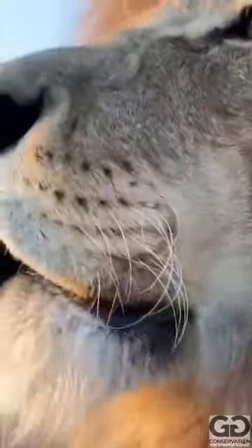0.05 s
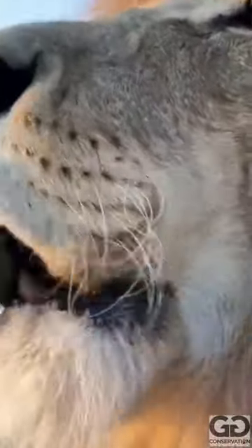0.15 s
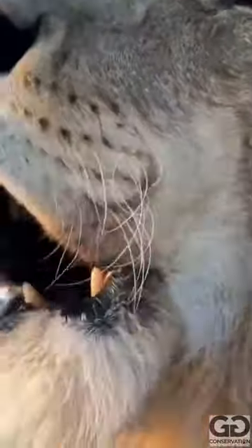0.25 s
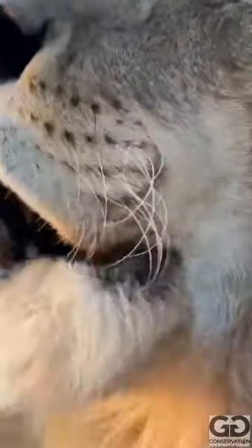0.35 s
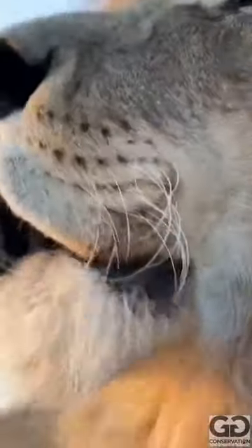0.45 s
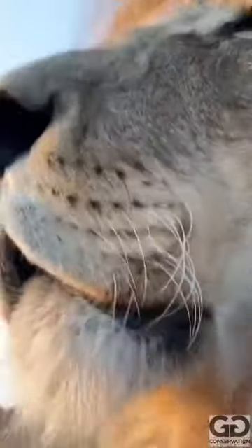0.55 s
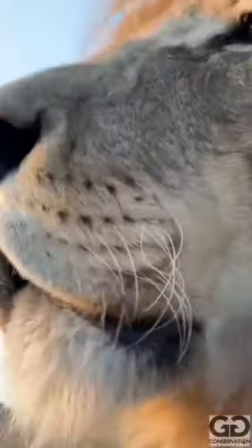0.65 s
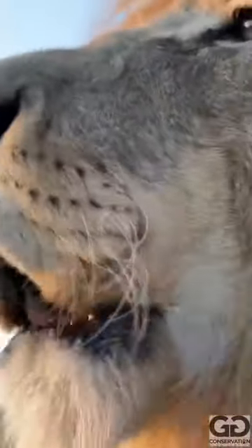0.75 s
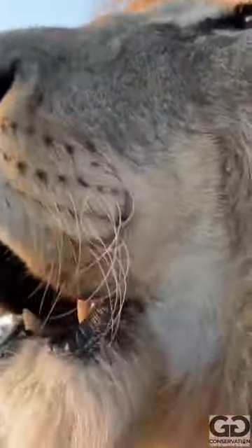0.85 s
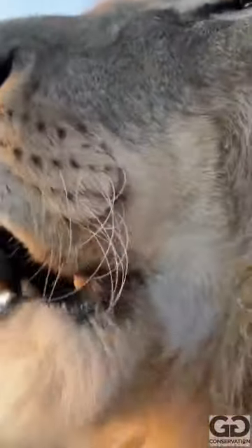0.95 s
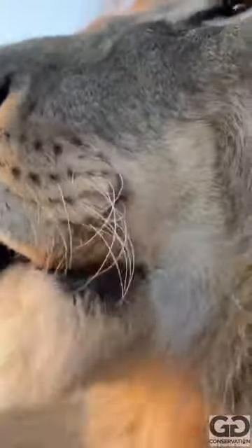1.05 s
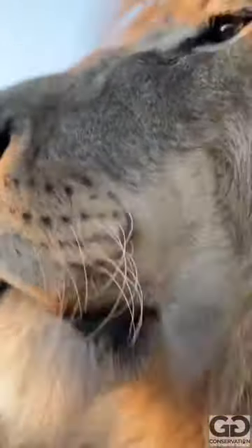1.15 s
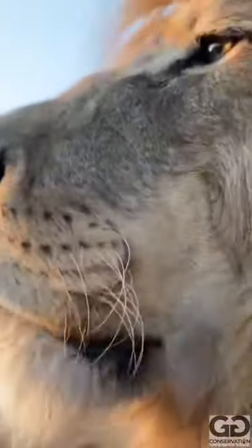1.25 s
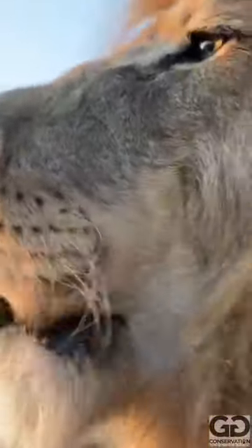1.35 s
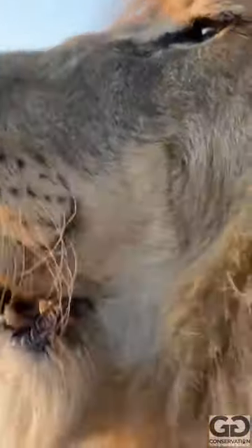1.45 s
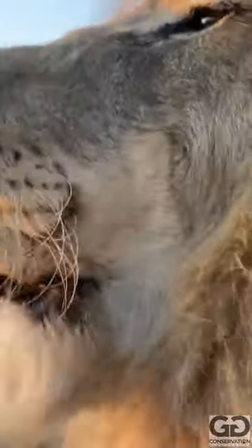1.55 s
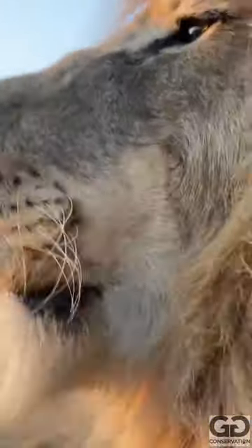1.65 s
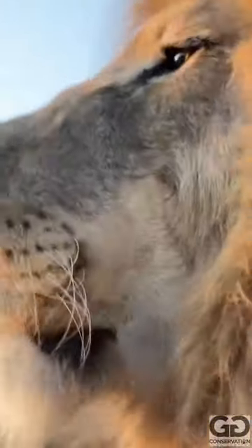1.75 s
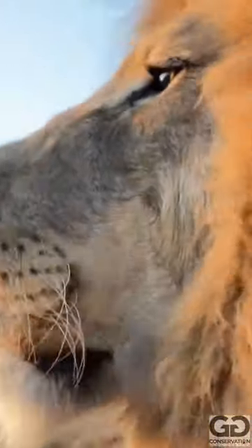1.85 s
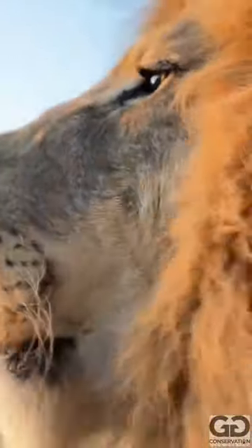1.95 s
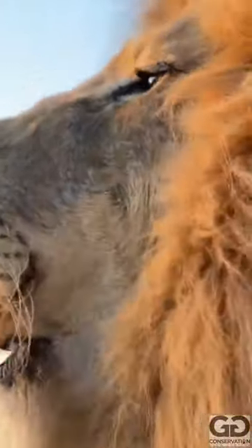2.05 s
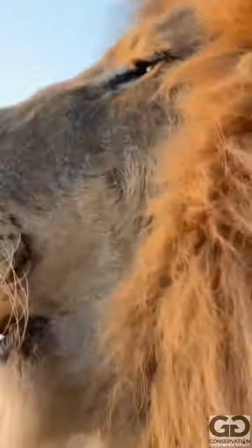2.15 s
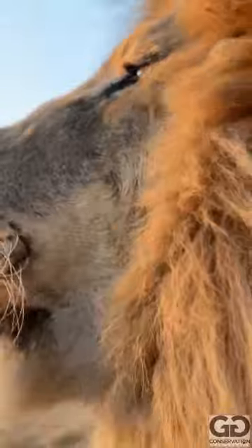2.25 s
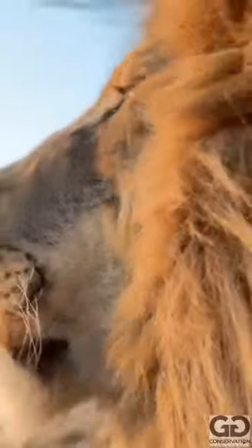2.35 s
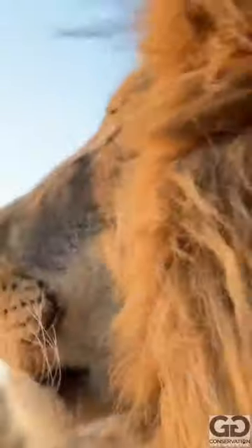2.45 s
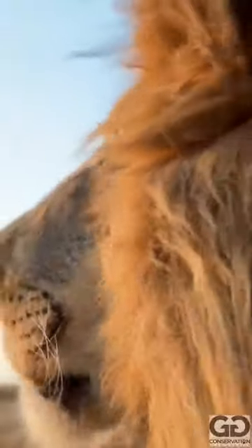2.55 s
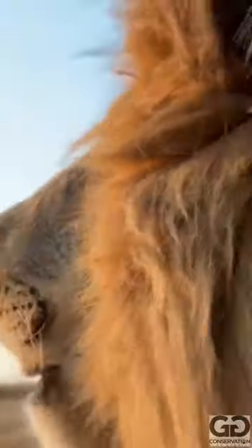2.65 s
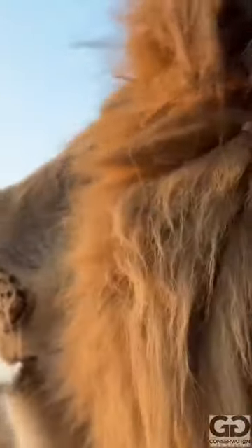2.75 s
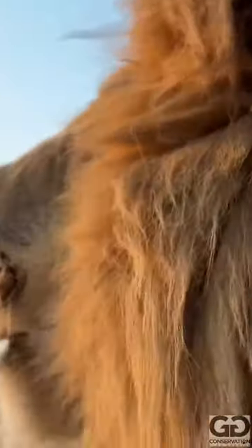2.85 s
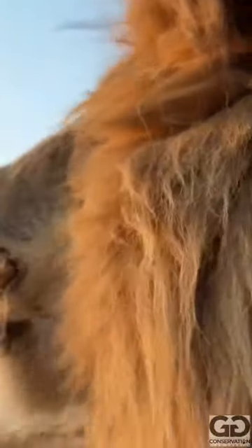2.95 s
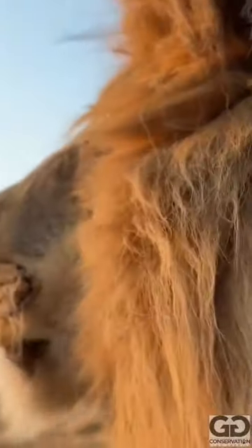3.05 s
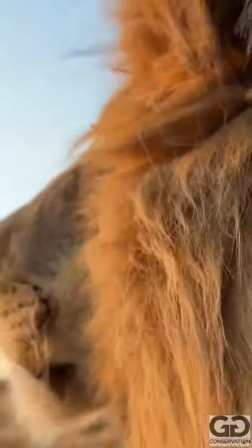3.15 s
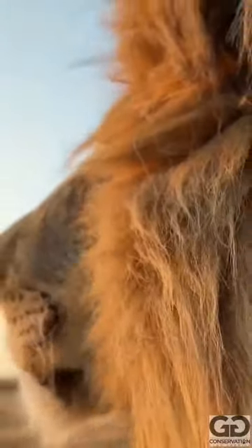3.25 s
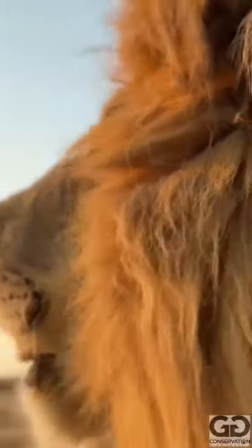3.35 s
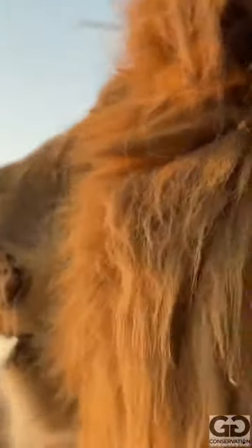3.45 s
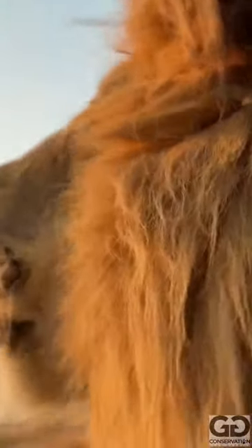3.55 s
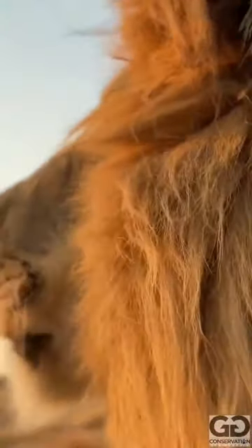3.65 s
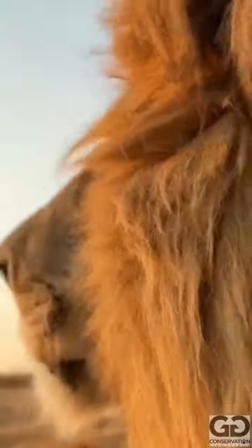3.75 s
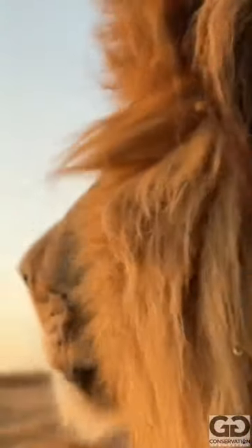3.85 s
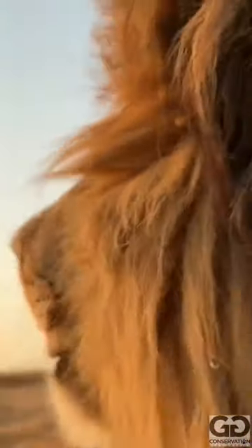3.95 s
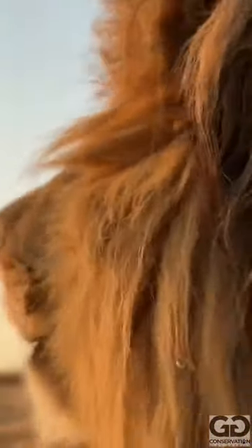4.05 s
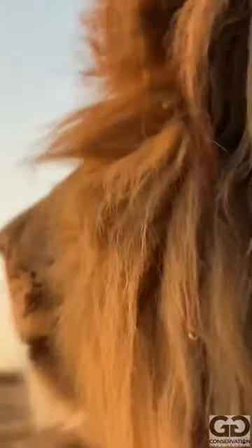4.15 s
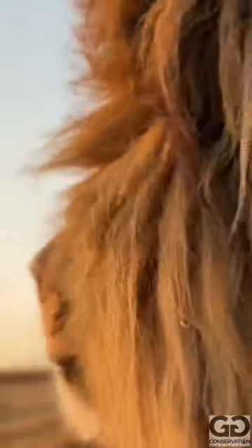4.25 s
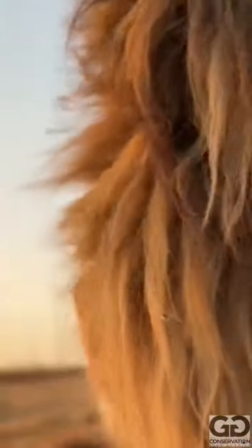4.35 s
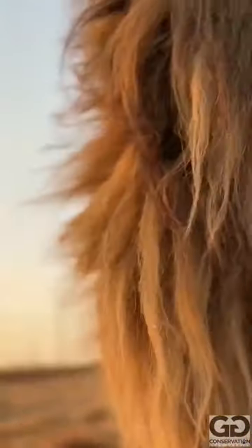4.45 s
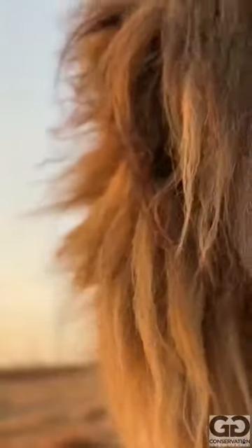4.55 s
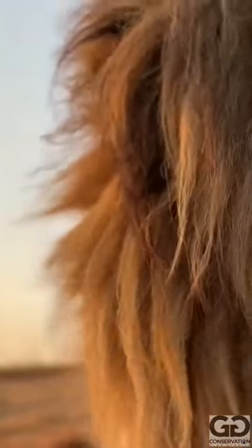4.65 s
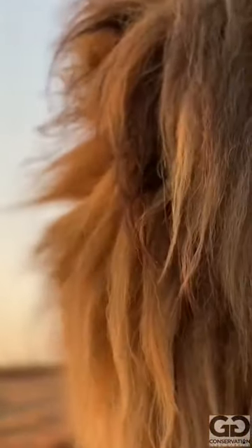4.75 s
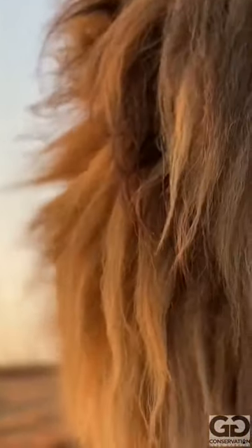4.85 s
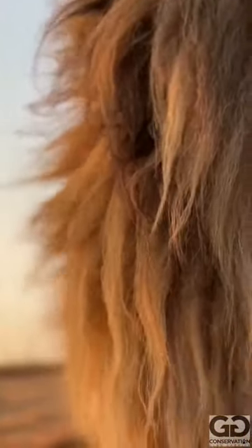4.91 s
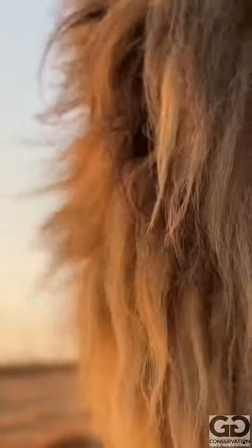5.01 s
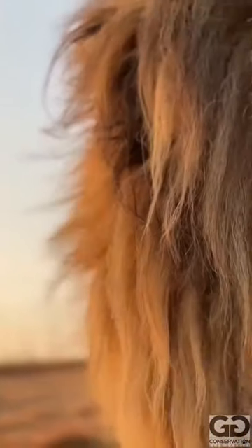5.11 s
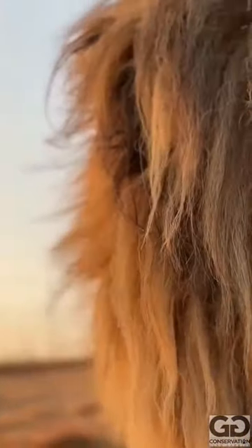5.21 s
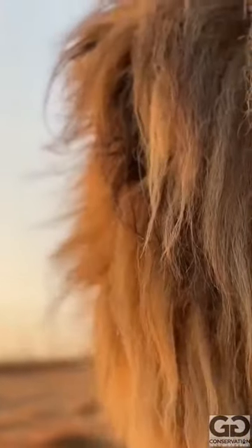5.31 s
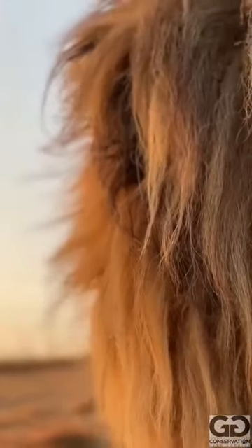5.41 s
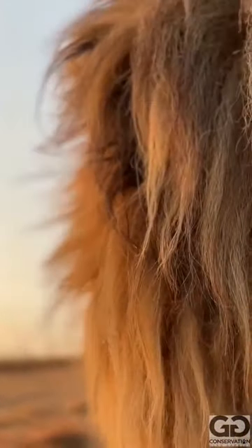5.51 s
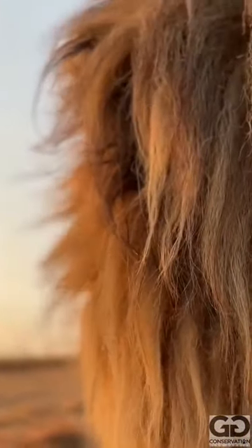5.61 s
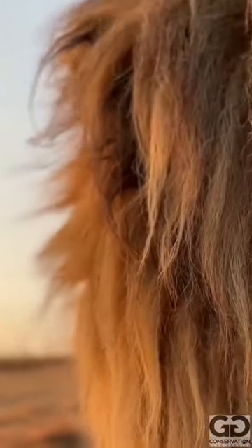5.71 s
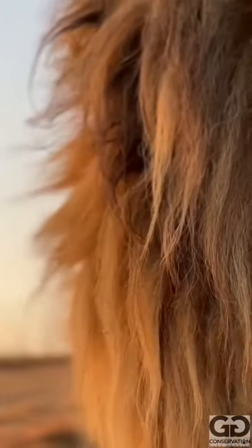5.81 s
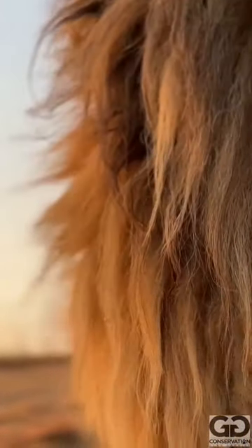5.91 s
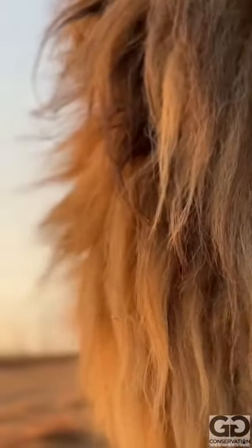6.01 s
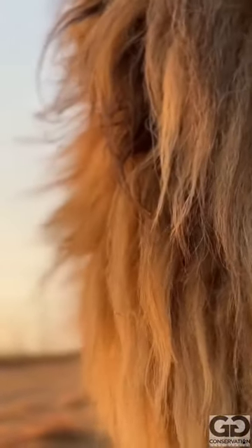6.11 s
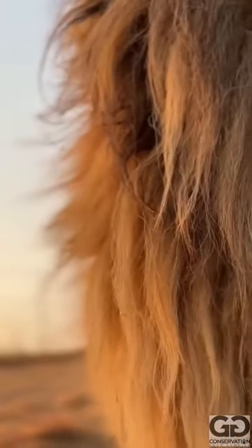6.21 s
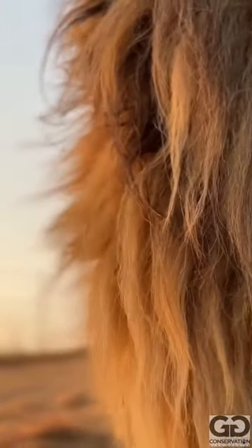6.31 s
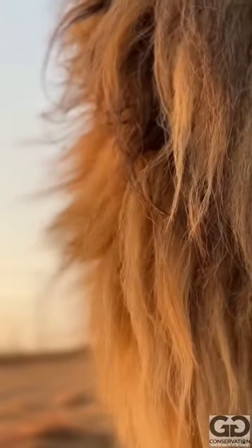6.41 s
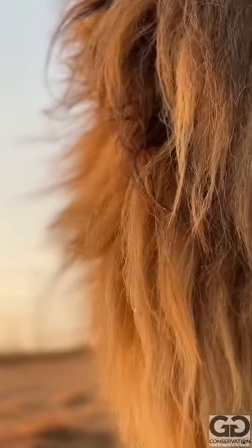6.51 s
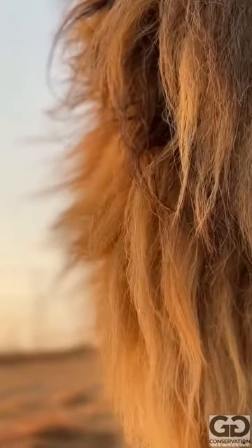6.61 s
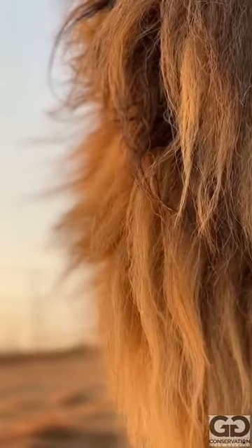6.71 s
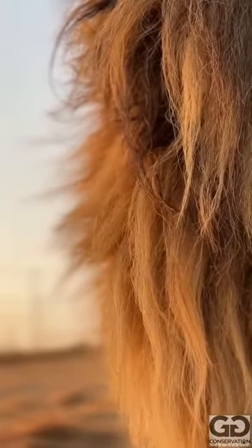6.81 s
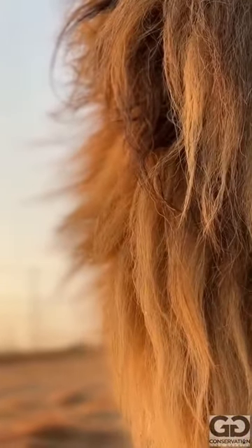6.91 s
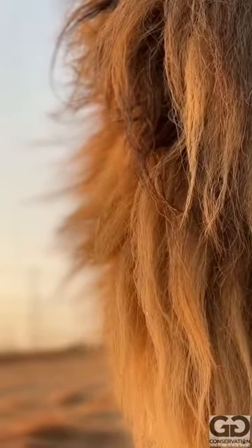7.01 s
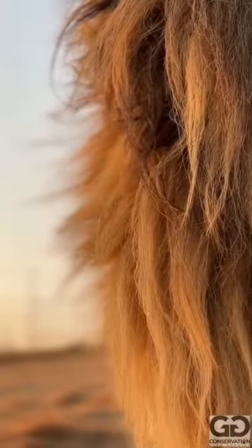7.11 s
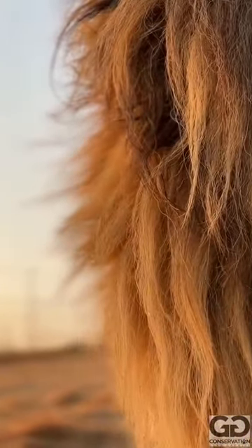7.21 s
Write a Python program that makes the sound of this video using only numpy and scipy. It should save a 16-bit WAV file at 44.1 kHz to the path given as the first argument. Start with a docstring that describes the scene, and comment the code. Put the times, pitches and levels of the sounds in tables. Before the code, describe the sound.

Close outdoors, a lion draws breath and grunts nine times in a slowing series, leaving a faint low hum.

```python
"""Over the murmur of an open plain, a gasp an arm's length from the microphone: a male lion is ending
a roaring bout with nine deep grunts, drawing air before each. His heavy vocal folds first buzz, then go
slack and flap in single beats while the jaw closes; chest, throat and mouth ring with them.
Afterwards two faint low hums remain, beating against each other like far engines."""
import sys
import numpy as np
from scipy import signal
from scipy.fft import rfft, irfft, next_fast_len
from scipy.io import wavfile
from scipy.ndimage import uniform_filter1d, map_coordinates

SR = 44100
rng = np.random.default_rng(int(sys.argv[2]) if len(sys.argv) > 2 else 0)


def transcribe(signal):
    """Save signal, clipped to [-1, 1], as a 16-bit WAV file at the path in sys.argv[1]."""
    frames = np.atleast_2d(signal).T
    limited = np.clip(frames, -1, 1)
    pcm = np.round(limited * 32767).astype(np.int16)
    wavfile.write(sys.argv[1], SR, pcm)


N = 320607
TIME = np.arange(N) / SR


def amp(db):
    """Decibels to gain."""
    return 10 ** (np.asarray(db) / 20)


def unit(x):
    """x at rms 1."""
    return x / np.sqrt(np.mean(x ** 2) + 1e-20)


def running_rms(x, size=1300):
    """The rms of x, smoothed twice over size samples."""
    power = uniform_filter1d(uniform_filter1d(x ** 2, size), size)
    return np.sqrt(np.abs(power) + 1e-12)


def along(points, hz):
    """Interpolate (Hz, value) points on a log frequency axis."""
    f, v = np.transpose(points)
    return np.interp(np.log(hz + 1), np.log(f + 1), v)


def curves(rows):
    """One value per sample for each column after the time."""
    times, *columns = np.transpose(rows)
    return [np.interp(TIME, times, column) for column in columns]


def noise():
    """White noise."""
    return rng.standard_normal(N)


def wobble(rate):
    """A smooth random curve, rate knots a second."""
    return map_coordinates(rng.standard_normal(int(N * rate / SR) + 4), [TIME * rate])


def coloured(x, spectrum):
    """x through a causal filter with the given (Hz, dB) spectrum."""
    size = 2 * next_fast_len(N // 2 + 8192)
    gain = amp(along(spectrum, np.fft.rfftfreq(size, 1 / SR)))
    cepstrum = irfft(np.log(gain))
    cepstrum[1:size // 2] *= 2  # folded for minimum phase
    cepstrum[size // 2 + 1:] = 0
    return irfft(rfft(x, size) * np.exp(rfft(cepstrum)))[:N]


def band(x, lo_hz, hi_hz, order):
    """x through a band-pass."""
    return signal.sosfilt(signal.butter(order, [lo_hz, hi_hz], "band", fs=SR, output="sos"), x)


def ring(x, hz, width_hz):
    """One resonance, whose centre may move; a unit blow rings at amplitude 1."""
    keep = np.exp(-np.pi * width_hz / SR)
    if np.ndim(hz) == 0:
        return signal.lfilter([1], [1, -keep * np.exp(2j * np.pi * hz / SR)], x).imag
    turn = np.exp(2j * np.pi * np.cumsum(hz) / SR)
    return (turn * signal.lfilter([1], [1, -keep], x * turn.conj())).imag


# The murmur of the plain at the microphone. Each row: time in seconds, level in dB.
MURMUR_LEVELS = [(0, -50.5), (.75, -61), (1.35, -67.5), (2.7, -65), (4.5, -68), (5.4, -62.5), (6.1, -46.5),
                 (6.5, -57.5), (7.27, -48.5)]
# Colours of the murmur and of the hiss under it. Each row: frequency in Hz, relative level in dB.
MURMUR_SPECTRUM = [(12, -78), (20, -45), (43, -24), (87, -20.5), (108, -6), (128, -11), (174, -24),
                   (205, -41), (328, -29.5), (387, -49), (774, -46.5), (1080, -70), (2040, -53),
                   (4950, -79.5), (15000, -82.5)]
HISS_SPECTRUM = [(30, 9), (300, 6), (1100, -0.5), (1700, -11.5), (4000, -21.5), (15000, -29)]


def plain():
    """Open ground all around: a dull, drifting murmur over a very faint even hiss."""
    level_db = curves(MURMUR_LEVELS)[0] + 1.4 * wobble(5.2)
    murmur = amp(level_db) * unit(coloured(noise(), MURMUR_SPECTRUM))
    return murmur + amp(-75) * unit(coloured(noise(), HISS_SPECTRUM))


# The breath before each grunt, close by. Each row: fullest moment in seconds, rise time in seconds,
# relative levels of throat and hiss in dB.
GASPS = [(0.267, 0.096, -43.5, -59), (.895, 0.11, -42.5, -61.5), (1.5, 0.097, -48, -64),
         (2.112, 0.11, -44.5, -62), (2.815, 0.12, -45.5, -65.5), (3.485, .125, -51, -69.5),
         (4.085, .09, -48, -68.5), (4.782, 0.14, -45.5, -66), (5.725, 0.22, -47, -68.5)]
# Colours of that breath, low and high. Each row: frequency in Hz, relative level in dB.
GASP_THROAT_SPECTRUM = [(88, -28.5), (150, 3.5), (205, -10.5), (301, -5), (399, 2.5), (481, -17), (574, -7),
                        (767, -25), (878, -9), (1010, -13.5), (1120, -15), (1300, -19), (1800, -30.5),
                        (2340, -52.5), (3960, -120)]
GASP_HISS_SPECTRUM = [(1000, -27), (1600, -2), (2200, 0.5), (3300, -6), (4200, -17.5), (6200, -18.5),
                      (9000, -30.5), (14000, -44)]


def gasps():
    """The lion draws air in: a soft swell through the resonances of his open throat."""
    fullest, rise, throat_db, hiss_db = np.transpose(GASPS)
    throat = gasp_swells(fullest, rise, throat_db, rise_db=28, fall_db_per_s=270.5)
    hiss = gasp_swells(fullest - .005, rise, hiss_db, rise_db=18, fall_db_per_s=380)  # peaks just ahead
    air = noise()
    vowel = ring(air, hz=395, width_hz=65) - amp(-6) * ring(air, hz=594, width_hz=52)
    vowel += amp(-.5) * ring(air, hz=919.7, width_hz=200) - amp(-4) * ring(air, hz=1160, width_hz=180)
    vowel = unit(band(vowel, lo_hz=250, hi_hz=1300, order=3))
    rush = throat * (amp(-3.5) * vowel + amp(-.5) * unit(coloured(noise(), GASP_THROAT_SPECTRUM)))
    rush += amp(1.5) * hiss * unit(coloured(noise(), GASP_HISS_SPECTRUM))
    flutter = amp(1.5 * wobble(40))
    chest = amp(1) * throat * unit(ring(noise(), hz=120, width_hz=15))
    return flutter * rush + chest


def gasp_swells(fullest, rise, levels_db, rise_db, fall_db_per_s):
    """Gain of one layer of the gasps: slow swells, each cut short by the coming grunt."""
    gain = np.zeros(N)
    for peak_s, rise_s, peak_db in zip(fullest, rise, levels_db):
        since = TIME - peak_s
        swell_db = rise_db * np.clip(-since / rise_s, 0, 2) ** 1.4
        gain += amp(peak_db - swell_db - fall_db_per_s * np.clip(since, 0, 1))
    return gain


# Nine grunts at arm's length. Each row: start, length and time the folds stay taut in seconds; pitch
# at first and on going slack in Hz; relative levels of chest, throat, mouth, rasp, upper throat
# resonances and top of the rasp in dB; base mouth resonance in Hz.
GRUNTS = [(0.343, 0.28, 0.075, 106.2, 116.1, -10.5, -11.5, -17, -32.5, 4, 1, 849),
          (0.956, 0.29, .1, 111, 117.9, -9.5, -12.5, -22, -34, 4, -2.5, 834),
          (1.560, .305, .085, 104, 120.9, -9.5, -11, -17.5, -35, 2.5, -0.5, 829),
          (2.176, 0.3, 0.098, 124, 122, -9.5, -13.5, -23, -38, -0.5, -2, 833),
          (2.878, .35, .115, 111.4, 109, -7, -16.5, -23, -41, 2, -1, 810),
          (3.542, 0.29, 0.082, 120, 110.4, -7, -12.5, -19, -41, -3, -7, 810.2),
          (4.139, .28, .075, 113, 106, -9, -17, -23, -42.5, -1, -8, 804),
          (4.841, .32, .1, 102.1, 106.9, -7, -13.5, -21.5, -41.5, 9, -8, 900),
          (5.813, 0.5, .09, 93, 97.8, -7.5, -14, -25, -45, 5, -8, 869.8)]
COLUMNS = "start length taut first_hz last_hz chest throat mouth rasp upper_throat rasp_top mouth_hz"
# Colour of the shuddering chest. Each row: frequency in Hz, relative level in dB.
CHEST_SPECTRUM = [(20, -24.5), (32, -19.5), (43, -1.5), (65, -5), (85, 3.5), (130, 6), (170, -4.5),
                  (215, -7), (260, -11), (400, -30.5), (900, -71)]


def grunts(jaw, slack):
    """Buzzing folds drive chest, throat and mouth; air rasps through them at every cycle."""
    chest, throat, mouth, rasp = effort()
    phase, blows = fold_buzz(slack)
    flow = airflow(slack)
    uneven = 1 + .091 * np.sin(phase / 2 + 1.2 * wobble(14))  # strong and weak cycles alternate
    tone = uneven * np.sin(phase) * amp(.5 - slack + (2.17 + 1.4 * slack) * wobble(60))
    rumble = coloured(noise(), CHEST_SPECTRUM)
    shudder_db = -8.5 + 2.5 * slack + .65 * raspiness_db()  # raspier grunts shake the chest more
    shudder = amp(shudder_db) * rumble / running_rms(rumble)
    drone = chest * amp(-8 * slack) * (tone + shudder)
    pulses = (blows + .5 * puffs(blows, life_s=.014)) * flow
    throat_gain = throat * amp(.5 - 4.5 * slack) * flow ** .6
    mouth_gain = mouth * amp(1 - 11 * slack) * flow ** 1.3
    body = driven(lambda x: throat_ring(x, jaw, spread=1.5 - slack), pulses, throat_gain)
    bark = driven(lambda x: mouth_ring(x, jaw), pulses, mouth_gain)
    grit = mouth_rasp(.5 * blows + puffs(blows, life_s=.009))
    air = rasp * grit / running_rms(grit) * amp(4 - 3.2 * slack) * flow ** .5
    return drone + body + bark + air


def which_grunt():
    """The number of the grunt that each sample belongs to."""
    return np.searchsorted([row[0] - .1 for row in GRUNTS[1:]], TIME)


def of_grunt(name):
    """One named column of the grunt table, sample by sample."""
    return np.transpose(GRUNTS)[COLUMNS.split().index(name)][which_grunt()]


def grunt_clock():
    """Per sample, in seconds: the grunt's age, its length, and how long its folds stay taut."""
    return TIME - of_grunt("start"), of_grunt("length"), of_grunt("taut")


def raspiness_db():
    """How much more each grunt rasps than the average one, sample by sample."""
    return of_grunt("rasp") - np.transpose(GRUNTS)[COLUMNS.split().index("rasp")].mean()


def slackness(delay_s=.02, slacken_s=.035):
    """0 while the folds are taut, 1 while they hang loose."""
    age, _, taut = grunt_clock()
    resting = np.clip(-age / .02 - 1, 0, 1)
    return np.maximum(resting, np.clip((age - taut - delay_s) / slacken_s + .5, 0, 1))


# How each part of the voice swells and fades. Each holds: starting level against its peak in dB,
# attack in seconds, change by the end in dB, exponent that bends the fall.
CHEST_ENVELOPE = (-16.5, 0.1046, -30.5, 2.04)
THROAT_ENVELOPE = (-14.5, 0.28, -48.5, 1.78)
MOUTH_ENVELOPE = (-11.5, 0.28, -45, 1.55)
RASP_ENVELOPE = (-21, 0.1131, -39, 1.82)


def effort(onset_db_per_s=1399.5, stop_db_per_s=519):
    """Gains of chest, throat, mouth and rasp: a quick swell, then a fall once the folds go slack."""
    age, length, taut = grunt_clock()
    spent = np.clip((age - taut) / (length - taut), 0, 1)
    edges_db = onset_db_per_s * np.minimum(age, 0) - stop_db_per_s * np.maximum(age - length, 0)
    parts = dict(chest=CHEST_ENVELOPE, throat=THROAT_ENVELOPE, mouth=MOUTH_ENVELOPE, rasp=RASP_ENVELOPE)
    gains = []
    for part, (start_db, attack_s, fall_db, bend) in parts.items():
        swell_db = start_db * (1 - np.clip(age / attack_s, 0, 1)) ** 3.2
        gains.append(amp(of_grunt(part) + edges_db + swell_db + fall_db * spent ** bend))
    return gains


def fold_buzz(slack, sag_hz_per_s=25, jitter=.03, slack_jitter=.1, scatter_db=3):
    """Phase of the folds and a blow per closure; taut folds glide, slack ones sag and stumble."""
    age, length, taut = grunt_clock()
    first_hz, last_hz = of_grunt("first_hz"), of_grunt("last_hz")
    hz = first_hz + (last_hz - first_hz) * np.clip(age / taut, 0, 1)
    hz -= sag_hz_per_s * np.clip(age - taut, 0, length)
    hz *= 1 + (jitter + slack_jitter * slack) * wobble(110)
    cycles = np.cumsum(hz) / SR
    closes = np.diff(np.floor(cycles), prepend=0) > 0
    return 2 * np.pi * cycles, closes * amp(scatter_db * noise())


def airflow(slack, leak=.58):
    """Less air passes while the folds stick together ahead of each slap; slack folds stick longer."""
    flow = np.ones(N)
    for at_s, _, _ in slaps():
        stuck_s = .01 + .013 * slack[round(at_s * SR)]
        flow[max(0, round((at_s - stuck_s) * SR)):round((at_s + .002) * SR)] = leak
    return uniform_filter1d(flow, size=130)


def puffs(blows, life_s):
    """Every blow releases a dying burst of turbulent air of the same energy."""
    keep = np.exp(-2 / (life_s * SR))
    return noise() * np.sqrt(signal.lfilter([1 - keep], [1, -keep], blows ** 2))


def driven(resonator, pulses, gain):
    """The resonator, driven so that its rms follows gain; it rings on when the pulses stop."""
    return resonator(pulses * gain / running_rms(resonator(pulses), size=1100))


# The jaw's path in the first seven grunts. Each row: share of the grunt's length, throat resonance
# in Hz, ratio to the base mouth resonance, lip resonance in Hz.
JAW_PATH = [(-.3, 325, 1.12, 1180), (0, 376, 1.05, 1080), (0.221, 410, 0.95, 1137), (.4, 415.6, 1.04, 1125),
            (.6, 364, .96, 1093), (.8, 324, 1.1, 1082), (1, 305, 1.14, 1210)]
# The last two, drawn-out grunts bend their vowel, one list each.
# Each row: time in seconds, then throat, mouth and lip resonances in Hz.
GROAN_VOWELS = [
    [(4.83, 380, 793, 1130), (4.885, 428, 850, 1118), (4.93, 395, 899.8, 1170), (4.965, 366, 772, 1083),
     (5.0, 349, 849, 1210), (5.025, 355.5, 934, 1226), (5.06, 346, 796, 1235), (5.115, 309, 960, 1268),
     (5.17, 290.1, 900, 1223)],
    [(5.805, 363, 780.3, 1013), (5.875, 357, 948.4, 1080), (5.912, 401.4, 747, 1118),
     (5.96, 350.7, 780, 949), (6.002, 417, 700, 1130), (6.035, 388, 834, 1240), (6.07, 356, 928, 1372),
     (6.11, 341, 864, 1250), (6.29, 302, 900, 1112)],
]


def jaw_resonances():
    """Throat, mouth and lip resonances in Hz: as the jaw shuts the first sinks, the other two rise."""
    age, length, _ = grunt_clock()
    share, *columns = np.transpose(JAW_PATH)
    throat_hz, mouth_ratio, lips_hz = [np.interp(age / length, share, column) for column in columns]
    jaw = np.array([throat_hz, of_grunt("mouth_hz") * mouth_ratio, lips_hz])
    for number, rows in enumerate(GROAN_VOWELS, len(GRUNTS) - len(GROAN_VOWELS)):
        jaw = np.where(which_grunt() == number, curves(rows), jaw)
    return jaw


def throat_ring(x, jaw, spread):
    """The sharp main resonance of the long throat; two broader ones grow as the jaw opens."""
    hz = jaw[0]
    main = amp(1) * ring(x, hz, width_hz=23.4)
    opening = np.clip((hz - 315) / 60, .1, 1) * amp(of_grunt("upper_throat"))
    upper = amp(-7.5) * ring(x, hz=464, width_hz=81) + amp(-14.5) * ring(x, hz=551.4, width_hz=42)
    return band(main + spread * opening * upper, lo_hz=251, hi_hz=680, order=3)


def mouth_ring(x, jaw):
    """Mouth and lip resonances, each with an upper neighbour; an unmoving one lies below them."""
    _, mouth_hz, lips_hz = jaw
    mouth = ring(x, mouth_hz, width_hz=25) - amp(.5) * ring(x, mouth_hz * 1.17, width_hz=49)
    lips = amp(1.5) * ring(x, lips_hz, width_hz=45) - amp(-.5) * ring(x, lips_hz * 1.085, width_hz=61)
    low = amp(-3.5) * ring(x, hz=681.3, width_hz=32)
    return band(mouth + lips - low, lo_hz=575, hi_hz=1279, order=4)


# Colour of the rasp, close to the mouth. Each row: frequency in Hz, relative level in dB.
RASP_SPECTRUM = [(900, -48), (1350, 6), (1600, -5), (1900, 1), (2600, -2.5), (3300, -5.5), (4100, -13.5),
                 (4700, -14), (5030, -17.5), (5400, -12.5), (8000, -21), (12800, -27.5), (13400, -41.5),
                 (15500, -45)]


def mouth_rasp(x, life_s=.0044, direct=.58):
    """The dense high resonances of the mouth lie differently in every grunt; late grunts are duller."""
    t = np.arange(SR // 40) / SR
    owner = which_grunt()
    rung = np.zeros(N + len(t))
    for number in range(len(GRUNTS)):
        cavity = rng.standard_normal(len(t)) * np.exp(-t / life_s)
        cavity = cavity / np.linalg.norm(cavity) + direct * (t == 0)
        part = signal.fftconvolve(x[owner == number], cavity / np.linalg.norm(cavity))
        start = np.argmax(owner == number)
        rung[start:start + len(part)] += part
    rasp = coloured(rung[:N], RASP_SPECTRUM)
    low = signal.sosfiltfilt(signal.butter(2, 5500, fs=SR, output="sos"), rasp)
    return low + amp(of_grunt("rasp_top")) * (rasp - low)


# Single slaps of the folds. Each row: time in seconds, strength in dB, brightness in dB.
FOLD_SLAPS = [(0.0, -30, 3), (0.368, -7, 1.5), (0.436, -14, 0.5), (0.464, -1.5, -0.5), (0.491, -10.5, -0.5),
              (0.558, -26.5, -6.5), (0.986, -8, 3.5), (1.057, -16, 8.5), (1.083, -3.5, 4),
              (1.138, -19, 3.5), (1.172, -19, -3), (1.585, -7.5, 2.5), (1.668, -4.5, 1), (1.692, -10.5, 4),
              (1.751, -21, -6), (2.239, -4.5, 3.5), (2.283, -1.5, 2), (2.304, -8.5, 2.5), (2.405, -31, -2),
              (2.927, -7, 0), (2.988, -8, -3), (3.033, -7, 4.5), (3.079, -16, -2), (3.127, -21, -3),
              (3.561, -7, 0.5), (3.652, -4.5, 4), (3.679, -19, 0.5), (3.751, -23, -6), (4.163, -8.5, 4),
              (4.194, -5.5, 2), (4.233, -2, 0.5), (4.261, -9, 1.5), (4.33, -21.5, -3), (4.886, -8.5, -2),
              (4.923, -10, -1), (4.996, -5.5, -8.5), (5.02, -4, -2.5), (5.052, -16, 1.5),
              (5.134, -35.5, -4), (5.84, -8, -11), (5.868, -2, 0), (5.88, -4, -0.5), (5.905, -4, -2),
              (5.952, 0, -5), (5.973, -0.5, 1.5), (5.995, 0.5, 1), (6.041, -12.5, -10), (6.072, -7.5, 1.5),
              (6.107, -18, 0.5), (6.177, -25.5, -2)]


def slaps(after_s=.043, after_loss_db=17.5, pause_s=.15):
    """Every slap: a soft one opening each grunt, the listed ones, a weaker beat before each pause."""
    opening = [(row[0], -22, -2) for row in GRUNTS]
    gaps = np.diff([row[0] for row in FOLD_SLAPS], append=np.inf)
    after = [(at_s + after_s, db - after_loss_db, bright_db)
             for (at_s, db, bright_db), gap in zip(FOLD_SLAPS, gaps) if gap > pause_s]
    return opening + list(FOLD_SLAPS) + after


def slap_blows(feeble_db=-28):
    """Blows on throat, chest, mouth and rasp; weak slaps are mostly thump, feeble ones lose that too."""
    at_s, db, bright_db = np.transpose(slaps())
    at = np.round(at_s * SR).astype(int)
    harsh_db = raspiness_db()[at]  # a slap is as harsh as its grunt
    chest_db = -10 + .17 * db + .6 * np.minimum(db - feeble_db, 0)
    mouth_db = -16.5 + .78 * db + bright_db + .5 * harsh_db
    rasp_db = -29 + .66 * db + bright_db + .7 * harsh_db
    blows = np.zeros((4, N))
    blows[:, at] = amp([db, chest_db, mouth_db, rasp_db])
    return blows


def flaps(jaw, slack):
    """Each lone slap of the folds thumps the chest, rings the tract and spits a puff of air."""
    throat, chest, mouth, rasp = slap_blows()
    chest = chest * amp(-15 * (1 - slack))  # only slack folds let a whole gulp of air through
    thump = amp(1.5) * ring(chest, hz=109, width_hz=18) - amp(-6) * ring(chest, hz=58, width_hz=26)
    body = amp(-3.5) * throat_ring(throat, jaw, spread=1.2 - .86 * slack)
    bark = amp(-6.5) * mouth_ring(mouth + .92 * puffs(mouth, life_s=.0082), jaw)
    crack = .45 * rasp + puffs(rasp, life_s=.0033) + .7 * puffs(rasp, life_s=.018)
    spit = amp(30.5) * mouth_rasp(crack)
    return band(thump, lo_hz=21.7, hi_hz=230, order=2) + body + bark + spit


# The ground around the lion. Each row: frequency in Hz, time to die away by 60 dB in seconds.
GROUND_DECAY = [(60, 0.85), (120, 0.19), (350, 0.22), (1000, 0.23), (4000, 0.1), (12000, 0.17)]


def ground(x):
    """Scatter from the sand and scrub around the microphone, longest in the bass."""
    hz, t, spectra = signal.stft(rng.standard_normal(SR // 2), SR, nperseg=512)
    decay = amp(-60 * t / along(GROUND_DECAY, hz)[:, None])
    tail = signal.istft(spectra * decay, SR, nperseg=512)[1]
    return signal.fftconvolve(x, tail / np.linalg.norm(tail))[:N]


# Two hums far across the plain. Each row: time in seconds, pitch in Hz, relative level in dB.
LOW_HUM = [(6.3, 112.4, -40.5), (6.466, 119.9, -43), (6.762, 130, -39), (7.03, 128.9, -43),
           (7.1, 131.1, -45.5), (7.24, 134, -46.5)]
HIGH_HUM = [(6.33, 149.4, -55.5), (6.546, 167.3, -61.5), (6.838, 170, -56.5), (6.89, 162.2, -54),
            (7.138, 155.8, -41), (7.24, 151, -40)]


def hums(fade_in_s=.0585):
    """Two far hums come in; toward the end their pitches draw closer and their beat slows."""
    both = np.zeros(N)
    for rows in (LOW_HUM, HIGH_HUM):
        hz, db = curves(rows)
        swell = np.clip((TIME - rows[0][0]) / fade_in_s + 1, 0, 1)
        both += swell * amp(db) * np.sqrt(2) * np.sin(2 * np.pi * np.cumsum(hz) / SR)
    return amp(-2.5) * both


def scene():
    """One microphone on open ground: the lion at arm's length, the quiet plain behind him."""
    jaw, slack = jaw_resonances(), slackness()
    lion = grunts(jaw, slack) + flaps(jaw, slack) + gasps()
    return (lion + amp(-25) * ground(lion) + hums() + plain())[None]


def record(dry, low_cut_hz=36, top_hz=15500):
    """The microphone drops the deepest bass, the loudest peaks are rounded, the band ends steeply."""
    size = next_fast_len(N + SR // 2)
    hz = np.fft.rfftfreq(size, 1 / SR)
    low_cut = 1 - 1 / (1 + (hz / low_cut_hz) ** 6)
    heard = irfft(rfft(dry, size) * low_cut, size)
    rounded = heard / (1 + np.abs(heard) ** 8) ** (1 / 8)
    return irfft(rfft(rounded) * (hz < top_hz), size)[..., :N]


dry = scene()
out = record(dry)
transcribe(out)
```